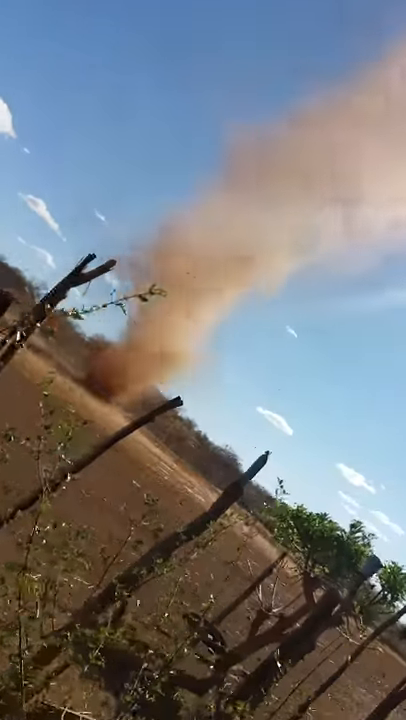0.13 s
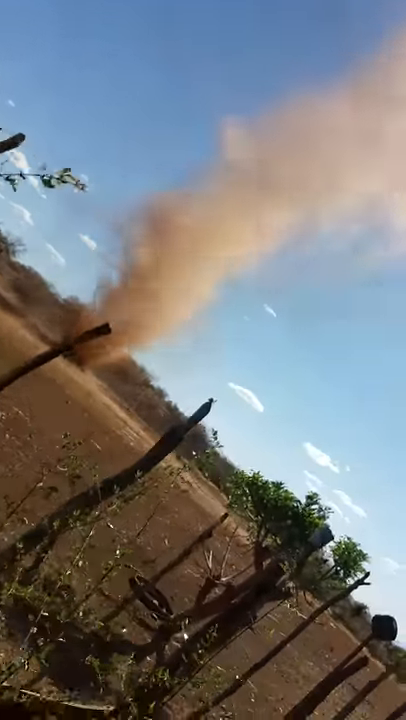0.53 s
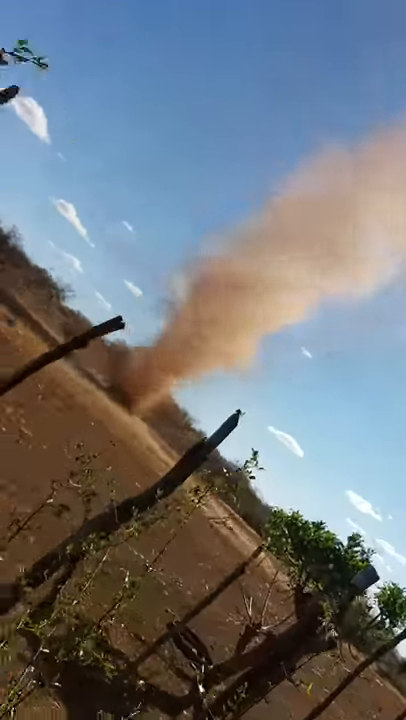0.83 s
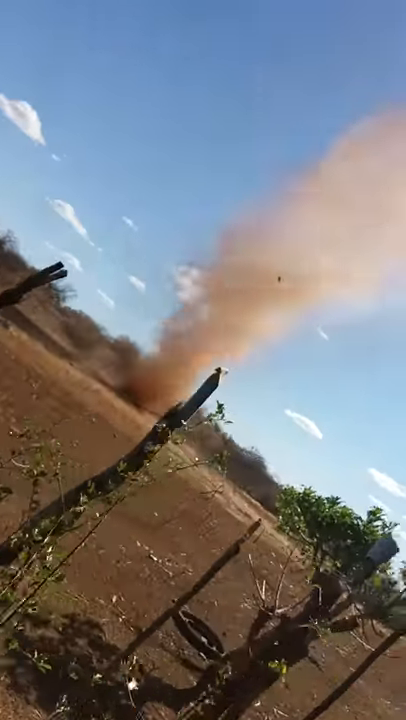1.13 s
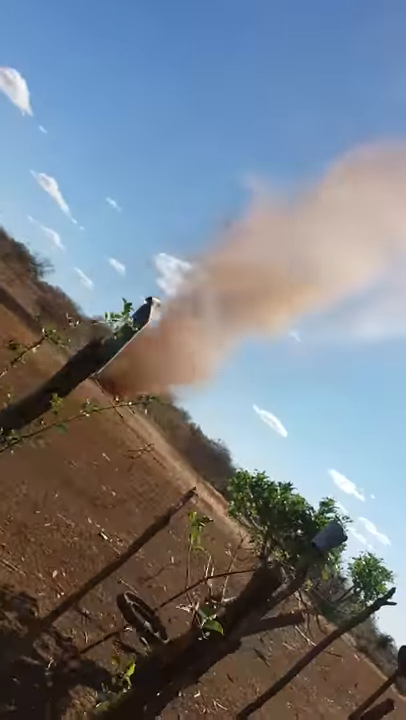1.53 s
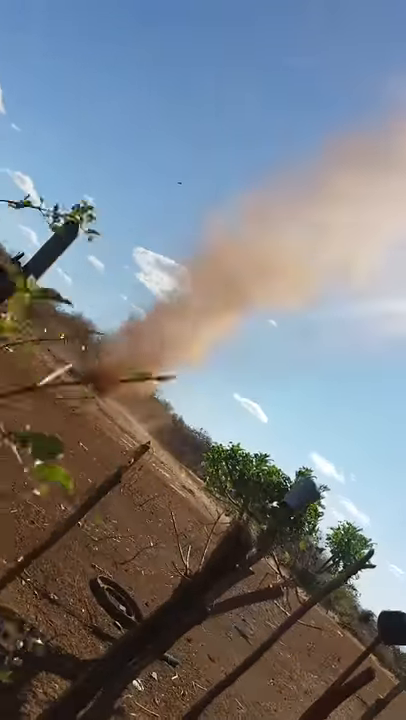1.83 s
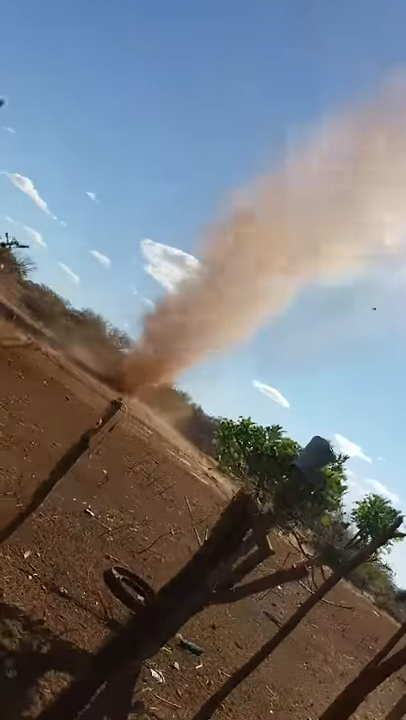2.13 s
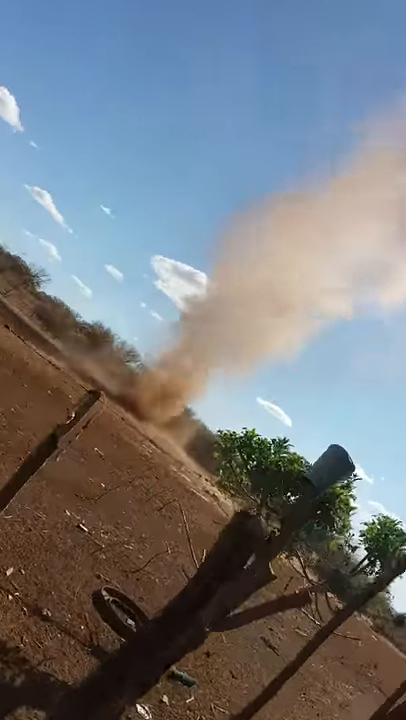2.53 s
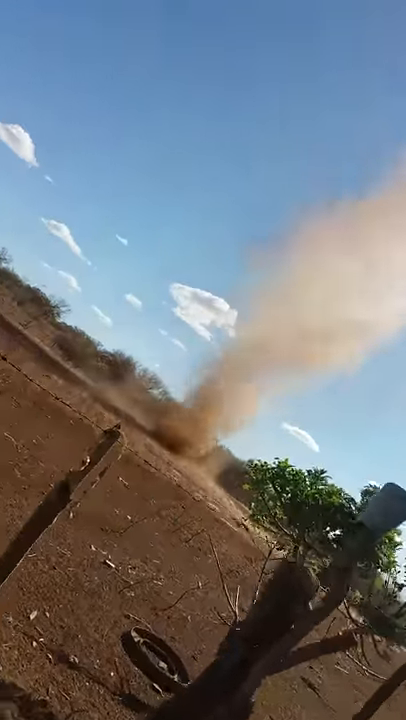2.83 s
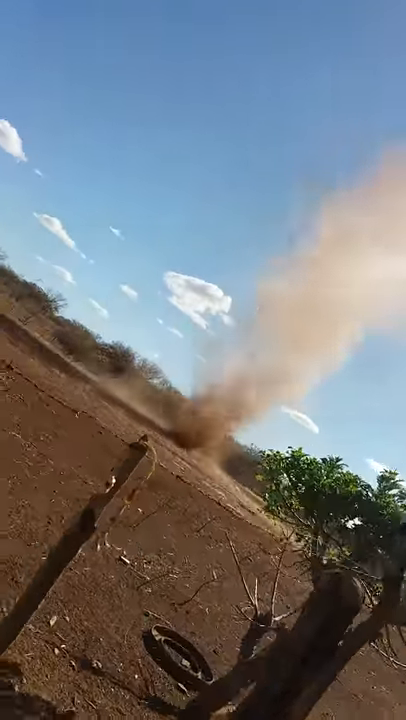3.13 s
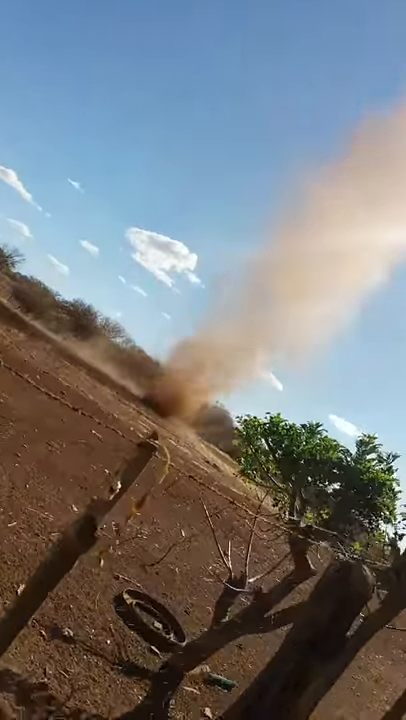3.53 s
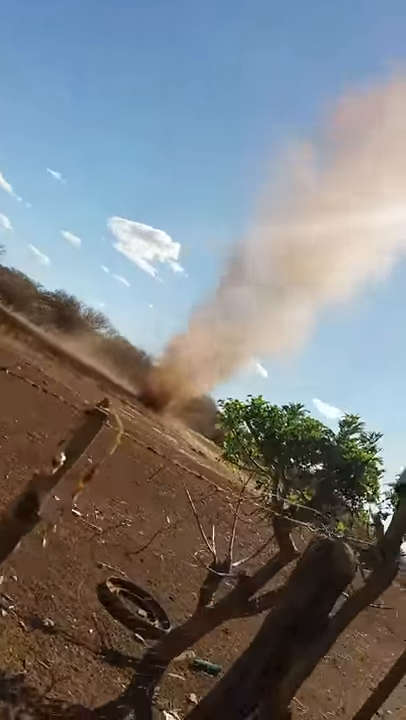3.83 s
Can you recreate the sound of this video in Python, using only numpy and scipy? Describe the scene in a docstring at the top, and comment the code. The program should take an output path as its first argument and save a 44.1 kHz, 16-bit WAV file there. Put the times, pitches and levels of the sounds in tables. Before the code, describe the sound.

Low wind gusts buffet the microphone, then drop, with a few twig snaps and scuffs.

```python
"""Low, lumpy gusts thump on the microphone as a dust whirlwind crosses dry open ground.
For two seconds its eddies buffet the microphone and the air hisses through dry scrub;
then the wind drops, leaving a soft far rush and one faint, breathy whistle.
Close by, twigs snap and something scuffs. The microphone port colours it all."""
import sys
import numpy as np
from scipy import signal
from scipy.fft import rfft, irfft
from scipy.io import wavfile
from scipy.ndimage import uniform_filter1d

SR = 44100
rng = np.random.default_rng(int(sys.argv[2]) if len(sys.argv) > 2 else 0)


def wav_out(sig):
    """Save sig, one row per channel (or a flat mono array), as 16-bit PCM at SR to the path in sys.argv[1]."""
    wavfile.write(sys.argv[1], SR, np.round(np.clip(np.atleast_2d(sig).T, -1, 1) * 32767).astype(np.int16))


N = 176400
TIME = np.arange(N) / SR
PORT_HZ, PORT_WIDTH_HZ, PORT_GAIN = 1392, 76, 1.12   # resonance of the microphone port

# Fader of the far rush: time_s, level_db
RUSH_FADER = [(0, -61), (2.3, -52), (2.65, -52), (2.9, -54), (3.1, -56), (3.42, -51), (3.62, -51),
              (3.8, -54.5), (4, -53.5)]
# Tone of the far rush: frequency_hz, gain_db
RUSH_SPECTRUM = [(30, -14), (48, 5.5), (64, 1), (150, -1), (260, -2.5), (380, -2.5), (520, -7),
                 (1050, -15.5), (1700, -12), (2500, -12.5), (3200, -23), (3900, -26.5), (5100, -17.5),
                 (6800, -30), (9000, -35), (15500, -45)]
# Fader of the air in the scrub: time_s, level_db
HISS_FADER = [(0, -44.5), (.3, -47), (.55, -47.5), (.8, -48), (1.1, -48.5), (1.38, -48), (1.65, -48),
              (1.87, -51), (1.98, -50.5), (2.1, -50), (2.4, -60), (4, -60.5)]
# Tone of the air in the scrub: frequency_hz, gain_db
HISS_SPECTRUM = [(300, 4.5), (700, 5.5), (1100, 1), (1600, -5.5), (2000, 3), (2650, -2), (3100, -10.5),
                 (3700, -12), (5200, -5.5), (6800, -12), (8000, -17), (9000, -23.5), (15500, -28)]
# Hollow swishes in the branches: peak_s, level_db, half_length_s, centre_hz
BRANCH_SWISHES = [(0.347, -55.5, 0.094, 2000), (0.983, -51.5, 0.32, 1380), (1.324, -50, 0.12, 1460),
                  (1.55, -52, 0.054, 1235), (1.986, -58, 0.033, 2030)]
# Dry scuffs: peak_s, level_db, half_length_s, resonance_hz, relative_grit_db
DRY_SCUFFS = [(0.602, -46.5, 0.029, 2140, -11), (0.744, -51, 0.012, 2300, -2),
              (0.824, -58, 0.045, 2160, 4.5), (2.191, -47.5, 0.031, 1760, -15),
              (2.224, -46, 0.019, 2320, -12.5), (2.268, -43, 0.02, 1740, -7), (2.49, -59, .015, 2400, -10),
              (2.694, -57, 0.0066, 2120, -3), (3.014, -66, .012, 2200, 8), (3.405, -55.5, 0.012, 1990, -9),
              (3.635, -53, .011, 2100, -6)]
# Tone of the grit in a scuff: frequency_hz, gain_db
GRIT_SPECTRUM = [(1000, 6), (2500, -23), (3400, -5), (5200, 6.5), (6600, 0.5), (8500, -11.5),
                 (11000, -11.5), (15500, -37)]
# Snapping twigs: start_s, level_db, pitch_hz, ring_t60_s, relative_crack_db
TWIG_SNAPS = [(0.123, -38.5, 5700, 0.043, -16), (.138, -41.5, 5050, .05, -19),
              (0.2733, -46.5, 6500, .015, -2), (0.523, -47.5, 5100, 0.031, -11),
              (0.7052, -45.5, 4400, .015, 4), (0.7967, -47, 6100, .02, -6), (0.9787, -43.5, 8050, .014, -3),
              (1.0429, -40.5, 5050, 0.013, -19), (1.0424, -31, 8100, 0.011, -9),
              (1.6861, -50.5, 5900, 0.025, -4), (2, -46.5, 6600, 0.028, 4)]
# Tone of a twig's crack: frequency_hz, gain_db
CRACK_SPECTRUM = [(1500, -15), (3000, -10), (5000, 8), (8000, -4.5), (9300, -26), (11000, -9), (12200, -24),
                  (15500, -19)]
# Fader of the wind on the microphone, before its trim: time_s, level_db
WIND_FADER = [(0, -22.5), (.21, -27), (.36, -33.5), (.47, -22.5), (.6, -23.5), (.7, -17), (.9, -26.5),
              (1.1, -30), (1.18, -27), (1.25, -34.5), (1.36, -23), (1.53, -28), (1.59, -34), (1.69, -22.5),
              (1.83, -28), (1.92, -27.5), (2.07, -38.5), (2.22, -45), (2.33, -60), (2.5, -78)]
# Single eddies hitting the port, before their trim: peak_s, level_db, half_length_s, upper_edge_hz
EDDY_THUMPS = [(0.028, -16.5, 0.011, 376), (0.069, -18, 0.018, 243), (0.152, -20, 0.0058, 345),
               (0.677, -14, 0.012, 233), (0.744, -20, 0.018, 356), (0.776, -12.5, 0.011, 324),
               (0.805, -14.5, 0.0099, 355), (0.841, -24.5, 0.015, 393), (0.895, -23, 0.011, 334),
               (1.001, -20.5, 0.015, 350), (1.199, -18, 0.0088, 280), (1.33, -12, 0.0069, 370),
               (1.375, -20, 0.011, 310), (1.468, -16.5, 0.012, 311), (1.512, -29, 0.034, 376),
               (1.641, -22, 0.0091, 288), (1.718, -17.5, 0.0037, 336), (1.741, -21, 0.0034, 390),
               (1.777, -24.5, 0.005, 362), (1.882, -15, 0.0055, 249), (2.135, -20.5, 0.0094, 200)]


def from_db(db):
    """Decibels to gain."""
    return 10 ** (np.asarray(db) / 20)


def unit_power(x):
    """Scale to an RMS of one."""
    return x / np.sqrt(np.mean(x ** 2) + 1e-20)


def fader(points):
    """A level in dB at every sample, ramping from point to point."""
    return np.interp(TIME, *np.transpose(points))


def swell(peak_s, db, half_s):
    """A Gaussian rise and fall around one moment."""
    return from_db(db) * np.exp(-.5 * ((TIME - peak_s) / half_s) ** 2)


def decay(start_s, t60_s):
    """A hard attack and an exponential fade."""
    return (TIME >= start_s) * from_db(-60 * np.clip((TIME - start_s) / t60_s, 0, 4))


def shaped_noise(gain_at):
    """Noise of unit power with a given gain at each frequency."""
    hz = np.maximum(np.arange(N // 2 + 1) * SR / N, 1)
    return unit_power(irfft(rfft(rng.standard_normal(N)) * gain_at(hz), N))


def coloured_noise(spectrum):
    """Noise through a tabled EQ curve, with nothing below 20 Hz."""
    hz, db = np.transpose(spectrum)
    return shaped_noise(lambda f: from_db(np.interp(np.log(f), np.log(hz), db)) * (f > 20))


def drift(rate_hz):
    """A random wobble of unit power, mostly slower than the given rate."""
    return shaped_noise(lambda f: 1 / (1 + (f / rate_hz) ** 2))


def resonate(x, hz, width_hz):
    """One resonance with unity gain at its peak."""
    r = np.exp(-np.pi * width_hz / SR)
    feedforward = np.array([1, 0, -1]) * (1 - r * r) / 2
    feedback = [1, -2 * r * np.cos(2 * np.pi * hz / SR), r * r]
    return signal.lfilter(feedforward, feedback, x + 1e-18)


def noise_band(hz, width_hz):
    """Noise ringing in a steep-sided resonance."""
    once = resonate(rng.standard_normal(N), hz, width_hz)
    return unit_power(resonate(once, hz, width_hz))


def far_rush(waver_db=.5):
    """The bed: a soft, slightly wavering rush of distant wind."""
    return from_db(fader(RUSH_FADER) + waver_db * drift(14)) * coloured_noise(RUSH_SPECTRUM)


def scrub(flutter_db=1.2, ticks_per_s=35, tick_range_db=6.5, leaves_to_hiss_db=-20.5):
    """Air hisses and swishes through dry branches, and small leaves tick in it."""
    hiss = coloured_noise(HISS_SPECTRUM) * from_db(flutter_db * drift(13.6))
    ticks = rng.random(N) < ticks_per_s / SR
    sizes = from_db(tick_range_db * np.minimum(rng.exponential(1, N), 1))
    tick_envelope = signal.fftconvolve(ticks * sizes, decay(0, t60_s=0.011))[:N]
    leaves = unit_power(tick_envelope * noise_band(6000, width_hz=3000))
    swishes = sum(swell(peak_s, db, half_s) * noise_band(hz, width_hz=930)
                  for peak_s, db, half_s, hz in BRANCH_SWISHES)
    return from_db(fader(HISS_FADER)) * (hiss + from_db(leaves_to_hiss_db) * leaves) + swishes


def whistle():
    """One faint, breathy whistle at the port's pitch, turned down to offset the port's boost."""
    breath = noise_band(PORT_HZ, width_hz=240)
    return swell(peak_s=2.595, db=-48.5, half_s=.04) * breath / (1 + PORT_GAIN)


def scuffs(roughness_db=3):
    """Each scuff is a rough rub in one resonance, layered with bright grit."""
    grit = coloured_noise(GRIT_SPECTRUM)
    rubs = sum(swell(peak_s, db, half_s) * (noise_band(hz, width_hz=750) + from_db(grit_db) * grit)
               for peak_s, db, half_s, hz, grit_db in DRY_SCUFFS)
    return rubs * unit_power(from_db(roughness_db * drift(180)))


def twig_snaps(tail_db=-13.5):
    """Each twig breaks with a dry crack, a short ring and a faint tail."""
    crack_noise = coloured_noise(CRACK_SPECTRUM)
    snaps = np.zeros(N)
    for start_s, db, hz, t60_s, crack_db in TWIG_SNAPS:
        ring = noise_band(hz, width_hz=1100) * decay(start_s, t60_s)
        crack = crack_noise * from_db(crack_db) * decay(start_s, t60_s=0.011)
        tail = crack_noise * from_db(tail_db) * decay(start_s, t60_s=0.056)
        snaps += from_db(db) * (ring + crack + tail)
    return snaps


def turbulence(low_hz, edge_hz, steepness, evenness, window_s):
    """Pressure on the port: a low band that falls steeply above the eddy rate, its swings compressed."""
    pressure = shaped_noise(
        lambda f: 1 / np.sqrt((1 + (low_hz / f) ** 8) * (1 + (f / edge_hz) ** (2 * steepness))))
    power = uniform_filter1d(pressure ** 2, int(window_s * SR)) + 1e-9
    return unit_power(pressure / power ** (evenness / 2))


def wind_buffeting(lumpy_db=2.0, trim_db=0.5, edge_hz=199, pivot_db=-23.5, octaves_per_db=0.05):
    """Wind rumbles on the microphone, getting brighter as it blows harder."""
    wind_db = fader(WIND_FADER) + lumpy_db * drift(35)
    brightness = np.clip(octaves_per_db * (wind_db - pivot_db), -1, 1)
    rumble = np.zeros(N)
    for octave in (-1, -.5, -0.085, .5, 0.85):   # five layers, dark to bright
        crossfade = np.sqrt(np.maximum(1 - 2 * abs(brightness - octave), 0))
        layer = turbulence(69, edge_hz * 2 ** octave, steepness=3.57, evenness=0.36, window_s=.02)
        rumble += crossfade * layer
    return from_db(wind_db + trim_db) * rumble


def eddy_thumps(trim_db=-1.43):
    """Single eddies hit the port, each a short, dull thump."""
    thumps = np.zeros(N)
    for peak_s, db, half_s, edge_hz in EDDY_THUMPS:
        pressure = turbulence(80, edge_hz, steepness=4.15, evenness=0.82, window_s=0.0139)
        thumps += swell(peak_s, db + trim_db, half_s) * pressure
    return thumps


def scene():
    """The mono mix: all sources at one microphone."""
    return (whistle() + wind_buffeting() + eddy_thumps() + scrub() + far_rush()
            + scuffs() + twig_snaps())[None]


def record(dry):
    """The microphone adds its port resonance and its own hiss; the deepest bass and the top are cut."""
    self_noise_db, low_cut_hz, high_cut_hz = -69.5, 50, 15750
    port_ring = PORT_GAIN * resonate(dry, PORT_HZ, PORT_WIDTH_HZ)
    self_noise = from_db(self_noise_db) * rng.standard_normal(N)
    low_cut = signal.butter(5, low_cut_hz, "high", fs=SR, output="sos")
    high_cut = signal.ellip(12, .1, 80, high_cut_hz, fs=SR, output="sos")
    return signal.sosfilt(high_cut, signal.sosfilt(low_cut, dry + port_ring + self_noise))


dry = scene()
out = record(dry)
wav_out(out)
```